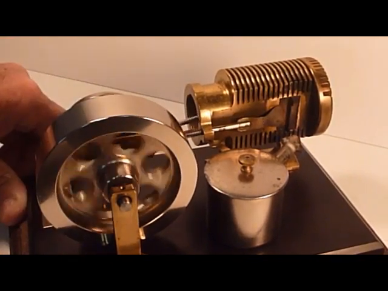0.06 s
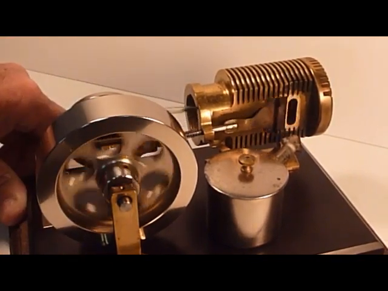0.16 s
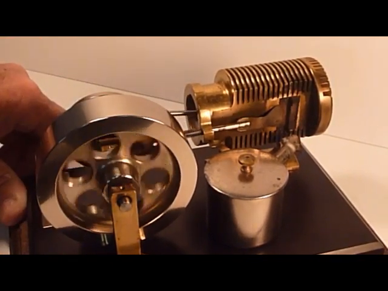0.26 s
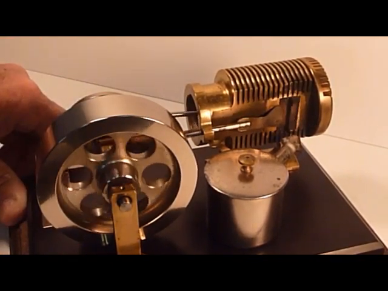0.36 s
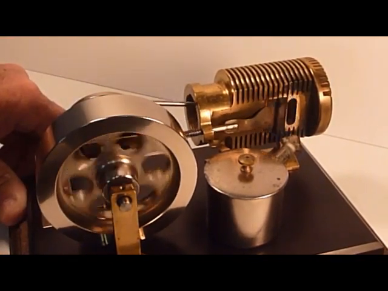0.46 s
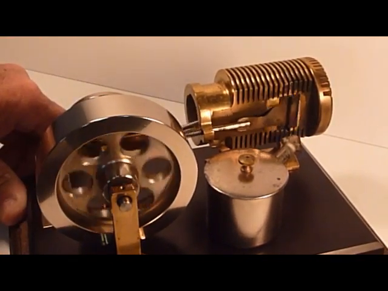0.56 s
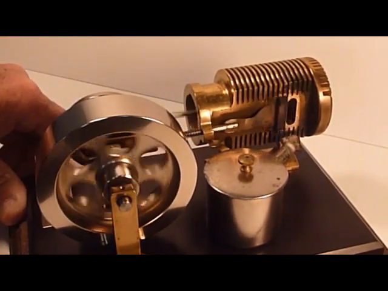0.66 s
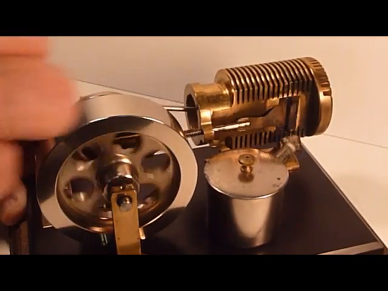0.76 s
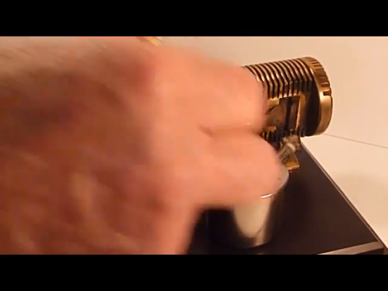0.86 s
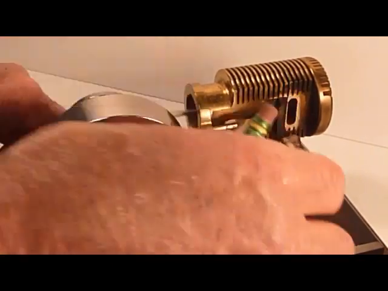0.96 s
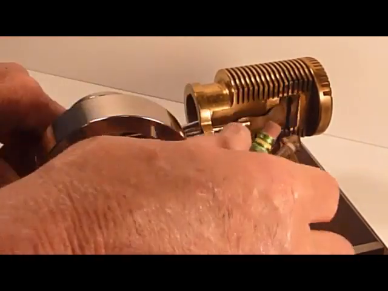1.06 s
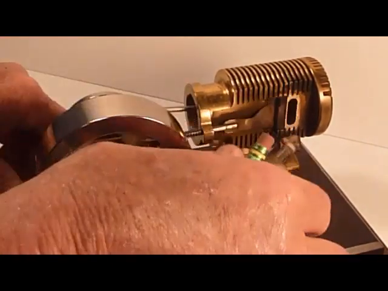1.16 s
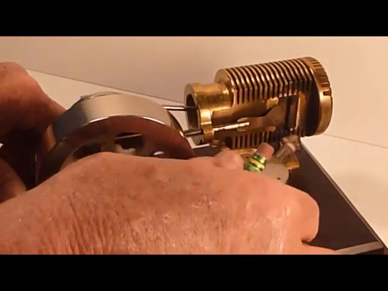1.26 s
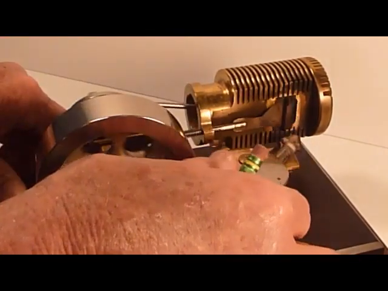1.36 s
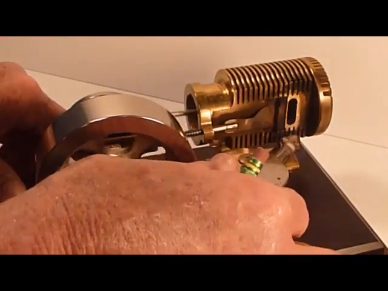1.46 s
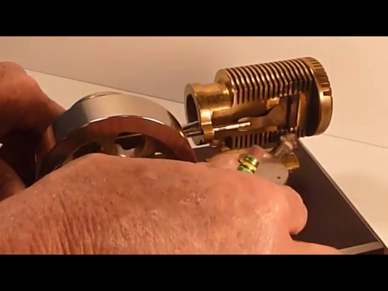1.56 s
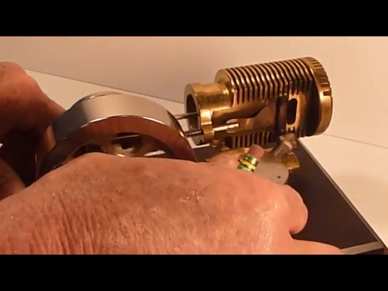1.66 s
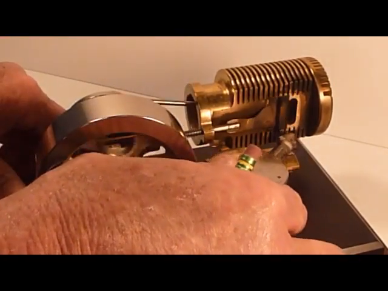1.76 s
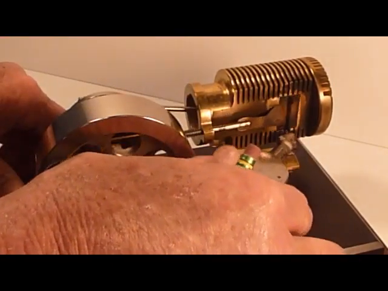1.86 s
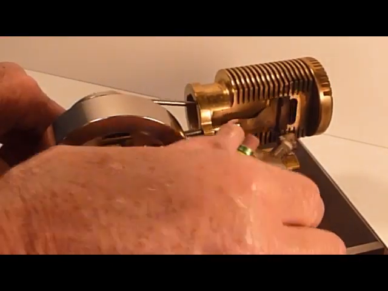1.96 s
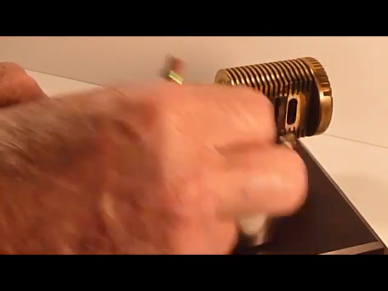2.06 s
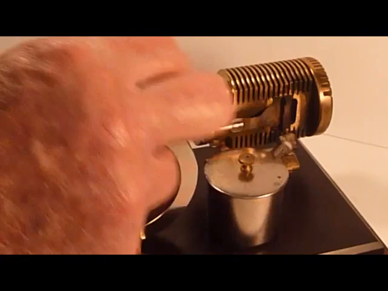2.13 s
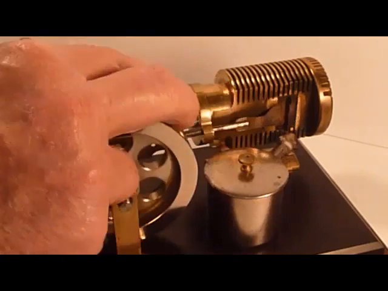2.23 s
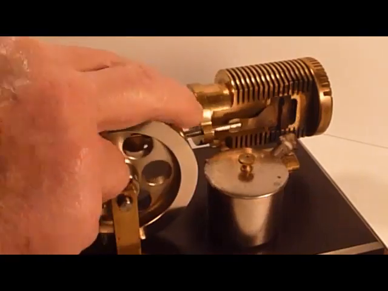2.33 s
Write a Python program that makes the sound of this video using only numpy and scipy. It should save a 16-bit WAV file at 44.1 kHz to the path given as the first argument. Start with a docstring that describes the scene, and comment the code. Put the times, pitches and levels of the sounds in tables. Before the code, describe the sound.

Slow mechanical clicking of a small metal engine moved by hand, close in a small room. A faint touch leads straight into a hard, bright snap at 0.23 s. Dull, short knocks follow at 0.56, 1.01, 1.49 and, weaker, 2.04 s. Lighter ticks fall at 0.75, 1.22 and 1.73 s. Low ventilation rumble, hum and soft hiss continue throughout.

```python
"""In a small room, a little flame-licker engine is rocked over by hand on a table, heard from close by.
Steady ventilation gives a rumble, a hiss and two wavering hum lines, made of coloured noise and sines.
After a light touch comes one hard snap, likely the valve; then dull piston knocks and linkage ticks.
Each contact is a short push, then decaying sine modes and a noise crack, with reflections and a tail.
Peaks over a limit duck the gain, which recovers slowly, and the loudest are rounded off."""
import sys
import numpy as np
from scipy import signal
from scipy.fft import rfft, irfft, next_fast_len
from scipy.io import wavfile
from scipy.ndimage import map_coordinates

SR = 44100
rng = np.random.default_rng(int(sys.argv[2]) if len(sys.argv) > 2 else 0)


def store_wav(level_fs):
    """Save 16-bit WAV to argv[1]."""
    pcm = np.round(np.clip(np.atleast_2d(level_fs), -1, 1) * 32767)
    wavfile.write(sys.argv[1], SR, pcm.T.astype(np.int16))


N = 103635  # length [samples]


def amp(db):
    """Decibels to gain."""
    return 10 ** (np.asarray(db) / 20)


def unit(x):
    """Scaled to rms 1."""
    return x / np.sqrt(np.mean(x ** 2) + 1e-20)


def along(points, hz):
    """Points of (frequency [Hz], value), read on a log frequency axis."""
    f, v = np.transpose(points)
    return np.interp(np.log(hz + 1), np.log(f + 1), v)


def filtered(x, response):
    """x shaped by a response, a function of frequency in Hz."""
    n = x.shape[-1]
    m = next_fast_len(n + SR // 10)
    spectrum = rfft(x, m) * response(np.fft.rfftfreq(m, 1 / SR))
    return irfft(spectrum, m)[..., :n]


def noise(spectrum, size):
    """Coloured noise of rms 1."""
    white = rng.standard_normal(size)
    return unit(filtered(white, lambda hz: amp(along(spectrum, hz))))


def diffuse(size):
    """White noise at two microphone ports: nearly alike in the bass, less so higher up."""
    # left-right likeness: (frequency [Hz], correlation)
    likeness = [(100, 0.99), (500, 0.98), (1200, 0.75), (2500, 0.47), (6000, 0.6)]

    def mid_side(hz):
        turn = np.arccos(np.clip(along(likeness, hz), 0, 1)) / 2
        return np.array([np.cos(turn), np.sin(turn)])

    mid, side = filtered(rng.standard_normal((2, size)), mid_side)
    return np.array([mid + side, mid - side])


def wobble(rate):
    """A smooth random curve, rate knots a second."""
    knots = rng.standard_normal(int(N * rate / SR) + 4)
    return map_coordinates(knots, [np.arange(N) * rate / SR])


def ventilation():
    """Air noise as low rumble and soft hiss, with two hum lines wavering in level and phase."""
    # rumble colour: (frequency [Hz], relative density [dB per Hz])
    rumble_colour = [(20, -20), (50, -18.5), (90, -9), (150, -8.5), (210, 2.5), (300, -5.5), (450, -9.5),
                     (650, -13), (950, -21), (1400, -26), (2200, -29), (5000, -65)]
    # hiss colour: (frequency [Hz], relative density [dB per Hz])
    hiss_colour = [(200, -10), (1300, 0), (2000, -5), (2900, -4), (3400, -4.5), (4000, -10.5),
                   (5200, -12.5), (6900, -21), (7700, -46), (9500, -44), (11500, -72)]
    # rumble level: (time [s], level [dB])
    rumble_level = [(0, -36), (.35, -35.5), (.7, -34), (1.25, -35), (2.35, -34.5)]
    # hum lines before they waver and drift with the rumble: (frequency [Hz], level [dB rms])
    hum_lines = [(119.5, -46.5), (274.3, -40)]
    hiss_db = -50.2
    waver_hz, waver_rad = 5, .35

    def air(colour):
        return unit(filtered(diffuse(N), lambda hz: amp(along(colour, hz))))

    t = np.arange(N) / SR
    rumble_db = np.interp(t, *np.transpose(rumble_level))
    hum = np.zeros(N)
    for hz, db in hum_lines:
        level = amp(db + wobble(waver_hz)) * np.sqrt(2)  # rms to peak
        hum += level * np.sin(2 * np.pi * hz * t + waver_rad * wobble(waver_hz))
    rumble = amp(rumble_db) * air(rumble_colour)
    hiss = amp(hiss_db) * air(hiss_colour)
    return rumble + hiss + amp(rumble_db - rumble_db.mean()) * hum


def add(track, s, sound):
    """Mix a sound into the track at time s."""
    part = track[..., max(0, round(s * SR)):][..., :sound.shape[-1]]
    part += sound[..., :part.shape[-1]]


def radiated(x, low_hz, high_hz):
    """A small part radiates little bass, and its contact softens the top."""
    edges = [low_hz, min(high_hz, .45 * SR)]
    return signal.sosfilt(signal.butter(2, edges, 'bandpass', fs=SR, output='sos'), x)


def in_room(x, walls_db, room_db):
    """The direct sound, a cluster of near reflections and the room's tail."""
    # how long the room rings: (frequency [Hz], t60 [s])
    room_t60 = [(150, 0.32), (600, 0.38), (1900, 0.42), (4000, .2), (10000, 0.15)]
    # stereo balance of the direct sound: (frequency [Hz], left minus right [dB])
    pan = [(100, 0.3), (300, 0.5), (650, 0.6), (1200, -2.5), (2500, -3.5), (5000, -2), (10000, -0.5)]
    # phase by which the left port leads: (frequency [Hz], lead [rad])
    lead = [(100, 0.2), (700, -0.19), (1300, -0.47), (3000, -.33), (6000, -0.24)]
    # first reflection from table and wall, how fast these die, and where their treble falls off
    walls_s, walls_t60_s, walls_dull_hz = 0.009, 0.035, 2800
    size = SR // 2
    t = np.arange(size) / SR

    # the tail dies at its own pace in each frequency band
    hz, frames, z = signal.stft(diffuse(size), SR, nperseg=256)
    decay = amp(-60 * frames / along(room_t60, hz)[:, None])
    tail = signal.istft(z * decay, SR, nperseg=256)[1][:, :size]
    tail = unit(tail * (t > 2 * walls_s))

    walls = diffuse(size) * np.exp(-np.log(1000) * t / walls_t60_s)
    walls = unit(walls * (t > walls_s))
    dull_walls = signal.lfilter(*signal.butter(1, walls_dull_hz, fs=SR), walls)
    answer = (amp(walls_db) * dull_walls + amp(room_db) * tail) / np.sqrt(size)

    half = np.array([[.5], [-.5]])  # each port takes half the difference

    def ports(hz):
        return amp(half * along(pan, hz)) * np.exp(1j * half * along(lead, hz))

    direct = filtered(x, ports)
    return direct + signal.fftconvolve(x[None], answer, axes=1)[:, :len(x)]


def strikes(events, modes, crack, crack_db, crack_t60, attack_s, push_s, push_db, rub_db,
            low_hz, high_hz, walls_db, room_db):
    """Each contact loads the part with a short rubbing push, then rings its modes with a brief crack."""
    ring_above_hz, ping_above_hz = 900, 2000  # middle modes follow ring, the highest follow ping
    out = np.zeros((2, N))
    t = np.arange(SR // 2) / SR
    u = np.linspace(0, 1, round(push_s * SR))
    push_shape = np.sin(np.pi * u ** 2) ** 2
    attack = 1 - np.exp(-t / attack_s)

    def fade(t60):
        return np.exp(-np.log(1000) * t / t60)

    for s, db, ring_db, ping_db, edge_db in events:
        rub = amp(rub_db + edge_db) * noise(crack, len(t))[:len(u)]
        push = push_shape * (amp(push_db) + rub)
        ring = np.zeros(len(t))
        for hz, level, t60 in modes:
            colour_db = ping_db if hz > ping_above_hz else ring_db * (hz > ring_above_hz)
            gain = amp(level + colour_db + rng.normal(0, 1))
            ring += gain * fade(t60) * np.sin(2 * np.pi * hz * t)
        contact = amp(crack_db + edge_db) * fade(crack_t60) * noise(crack, len(t))
        # the ring swings against the push
        blow = np.concatenate([push, (contact - ring) * attack])
        heard = in_room(radiated(blow, low_hz, high_hz), walls_db, room_db)
        add(out, s - push_s, amp(db) * heard)
    return out


def valve():
    """A light first touch, then a hard, bright snap that sets short modes ringing."""
    # touch and snap: (time [s], level [dB], ring [dB], ping [dB], crack [dB])
    snaps = [(.2204, -23, -1.5, 5.5, 3.5), (.2281, -2.5, 0.5, -7, -2)]
    # valve modes before the ring and ping trims: (frequency [Hz], level [dB], t60 [s])
    modes = [(347, 0, 0.017), (480, -14.5, 0.065), (689, 4.5, 0.012), (823, -16.5, 0.056),
             (1156, -4, 0.018), (1572, -16.5, 0.057), (1762, -3.5, 0.025), (1844, -1.5, 0.029),
             (2065, -11.5, 0.026), (3020, -7, 0.013), (3446, -8.5, 0.015), (4720, -16, 0.016)]
    # contact noise colour: (frequency [Hz], relative density [dB per Hz])
    crack = [(300, -1.5), (1500, -25), (2500, -4.5), (3400, 12.5), (4200, -1.5), (5000, 4), (7000, -12),
             (10000, -33), (15000, -42.5)]
    return strikes(snaps, modes, crack, crack_db=-10.0, crack_t60=0.016, attack_s=0.00031,
                   push_s=0.0012, push_db=1, rub_db=-29.0, low_hz=130, high_hz=11000,
                   walls_db=-14.0, room_db=-18.5)


def piston():
    """Pressure builds with a short rub, then lets go in a dull knock."""
    # knocks: (time [s], level [dB], ring [dB], ping [dB], crack [dB])
    knocks = [(0.5571, -4.5, 0, -5.5, -8), (1.0143, -3.5, -1.5, 0, -1.5), (1.4889, -4.5, -2, 2.5, -3),
              (2.0414, -8.5, -8.5, 5, -4)]
    # piston modes before the ring and ping trims: (frequency [Hz], level [dB], t60 [s])
    modes = [(244, -6, 0.023), (332, 4.5, 0.011), (472, -19, 0.096), (649, -7.5, 0.014), (800, -29, 0.012),
             (1132, -8.5, 0.027), (1267, -24, 0.093), (2364, -21.5, 0.012), (2518, -21.5, 0.022),
             (4630, -26, 0.012), (5040, -26, .013), (6670, -31, 0.021)]
    # contact noise colour: (frequency [Hz], relative density [dB per Hz])
    crack = [(300, -15), (1500, -3.5), (2500, 5), (3400, -2), (4100, 1.5), (5000, 1), (6700, 4.5),
             (7900, -44), (9600, -1), (11200, -54), (15000, -60.5)]
    return strikes(knocks, modes, crack, crack_db=-25.5, crack_t60=0.018, attack_s=0.00052,
                   push_s=0.0039, push_db=-7, rub_db=-18.5, low_hz=62, high_hz=9400,
                   walls_db=-9.5, room_db=-26.0)


def linkage():
    """The slack in the rods closes with a light tick."""
    # ticks: (time [s], level [dB], ring [dB], ping [dB], crack [dB])
    ticks = [(.7485, -17.5, -13.5, -8, -2), (1.2199, -18, 2.5, 0, -2.5), (1.665, -43, -28, -9, -1),
             (1.7329, -11.5, -1, -13.5, -11), (1.853, -47, 3, 4, 6.5)]
    # linkage modes before the ring and ping trims: (frequency [Hz], level [dB], t60 [s])
    modes = [(286.5, -1, 0.06), (360, -6, 0.038), (468, -9.5, 0.081), (674, -2.5, 0.013), (840, -22, .025),
             (1160, -18.5, 0.0087), (1560, -12, 0.023), (1770, -9.5, 0.023), (2860, -15, 0.042),
             (4600, -10.5, 0.022)]
    # contact noise colour: (frequency [Hz], relative density [dB per Hz])
    crack = [(300, -2.5), (1500, 3.5), (2700, 2), (3400, -5.5), (5300, -2), (6800, -16.5), (8200, -37),
             (11000, -17.5), (13000, -57.5)]
    return strikes(ticks, modes, crack, crack_db=0.0, crack_t60=.013, attack_s=0.00057,
                   push_s=0.0011, push_db=-2.5, rub_db=-12, low_hz=111, high_hz=6300,
                   walls_db=-8.5, room_db=-20)


def scene():
    """The engine over the room's background."""
    return ventilation() + valve() + piston() + linkage()


def record(dry):
    """Peaks over the limit duck the gain, which recovers slowly; then soft clipping and a band limit."""
    limit, lag_s, release_db_per_s = 0.75, 0.008, 47
    top_hz = 15600
    t = np.arange(N) / SR
    over_db = 20 * np.log10(np.maximum(np.abs(dry).max(axis=0) / limit, 1))
    recovery_db = release_db_per_s * t
    duck_db = np.maximum.accumulate(over_db + recovery_db) - recovery_db
    # the gain follows with a lag, so a sharp peak gets through to the clipper
    lag = np.exp(-1 / (lag_s * SR))
    held = dry * amp(-signal.lfilter([1 - lag], [1, -lag], duck_db))
    clipped = held / (1 + held ** 10) ** (1 / 10)
    return filtered(clipped, lambda hz: hz < top_hz)


dry = scene()
out = record(dry)
store_wav(out)
```